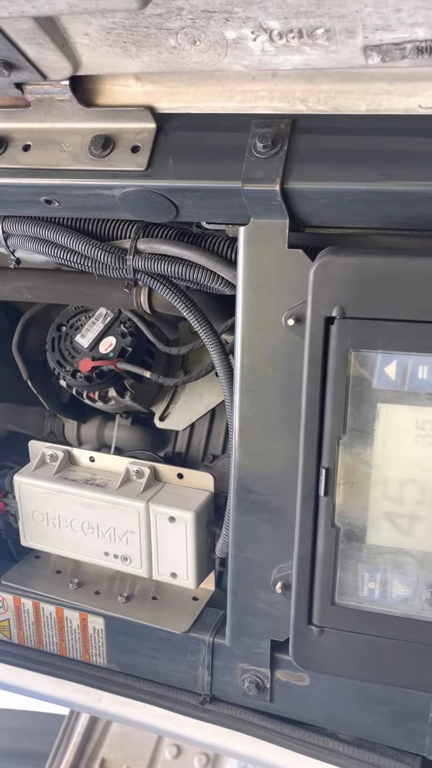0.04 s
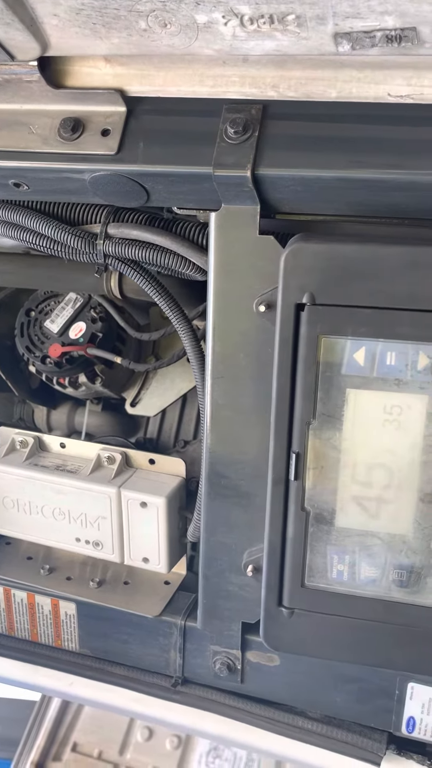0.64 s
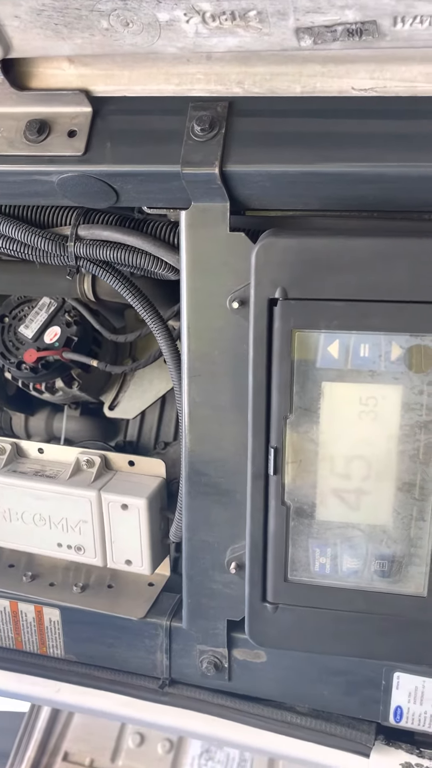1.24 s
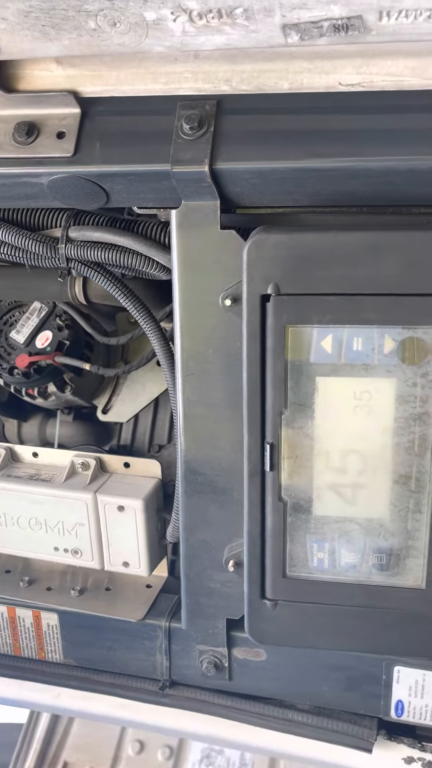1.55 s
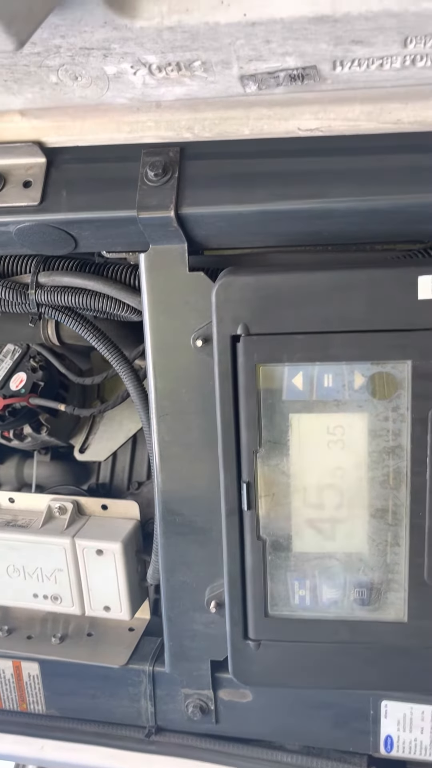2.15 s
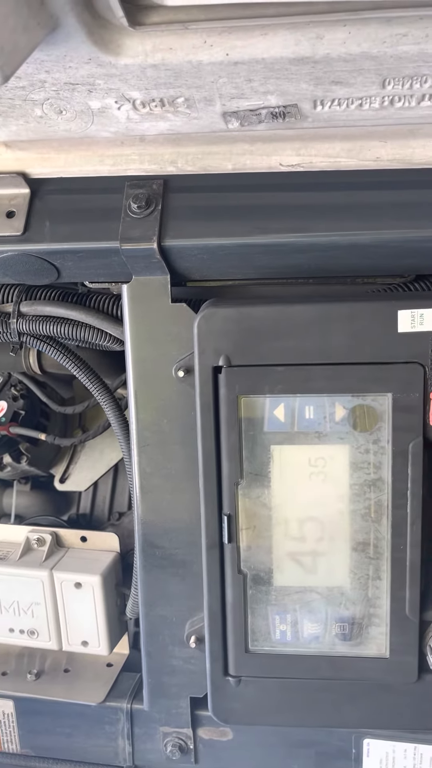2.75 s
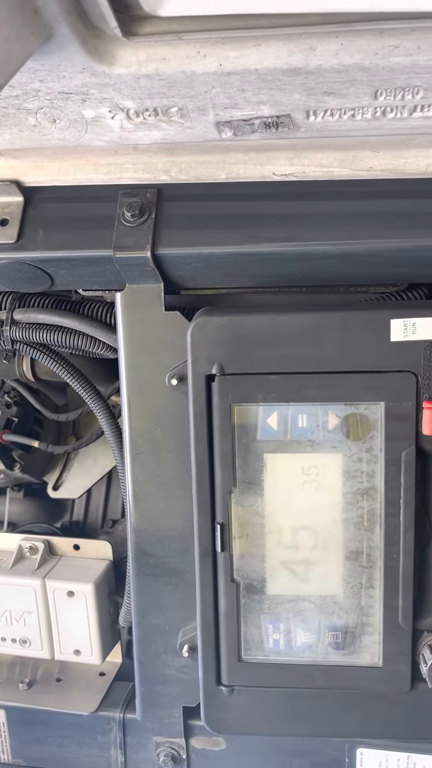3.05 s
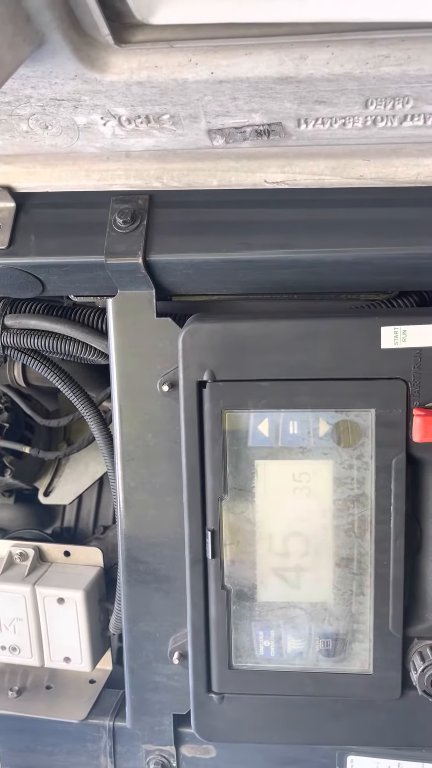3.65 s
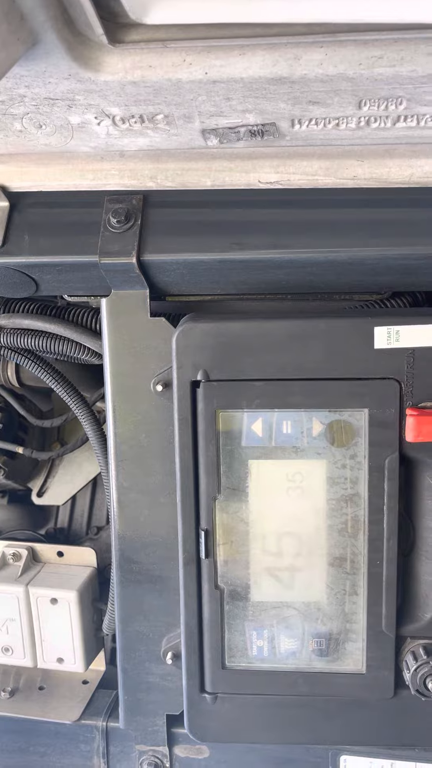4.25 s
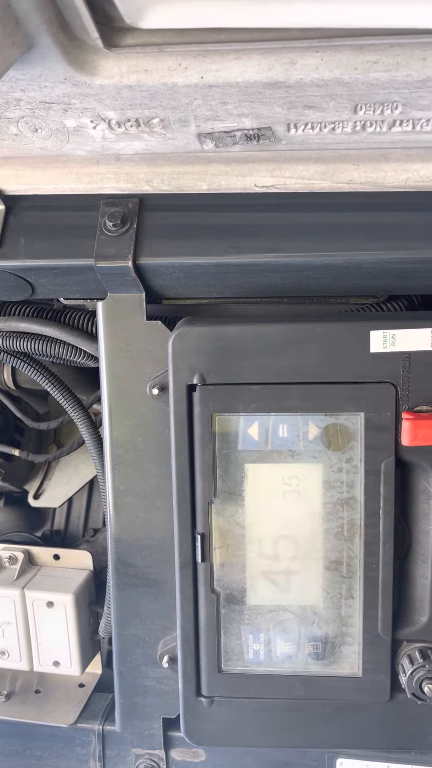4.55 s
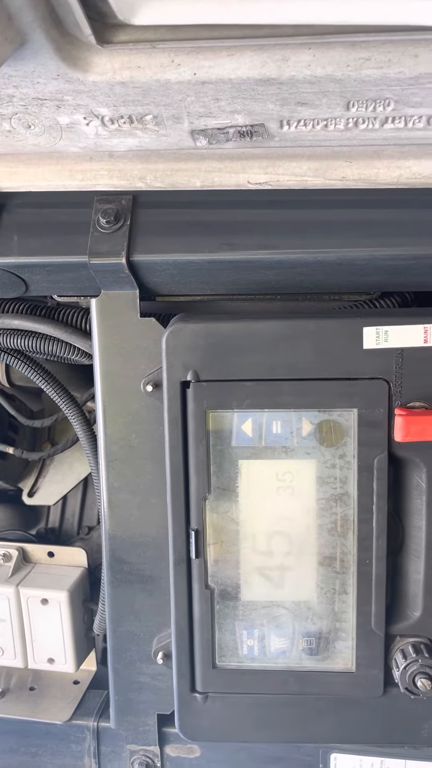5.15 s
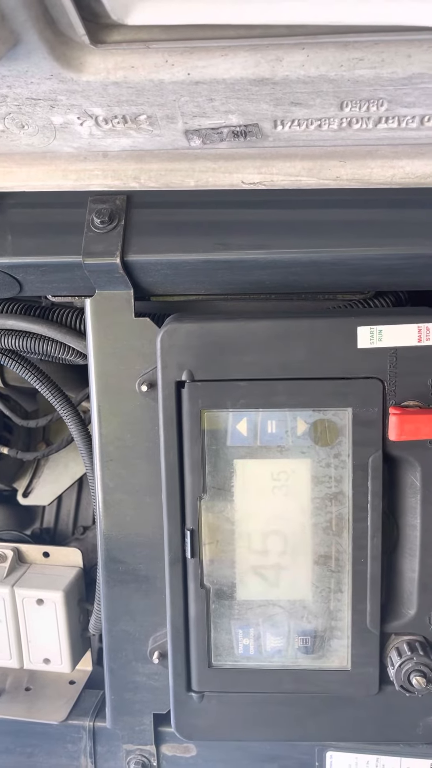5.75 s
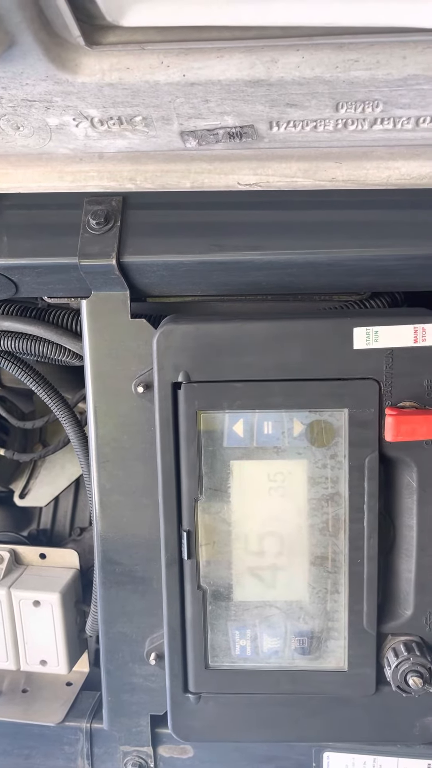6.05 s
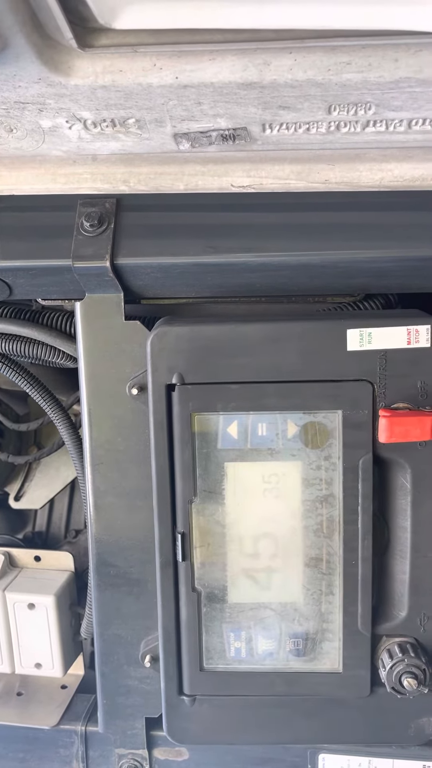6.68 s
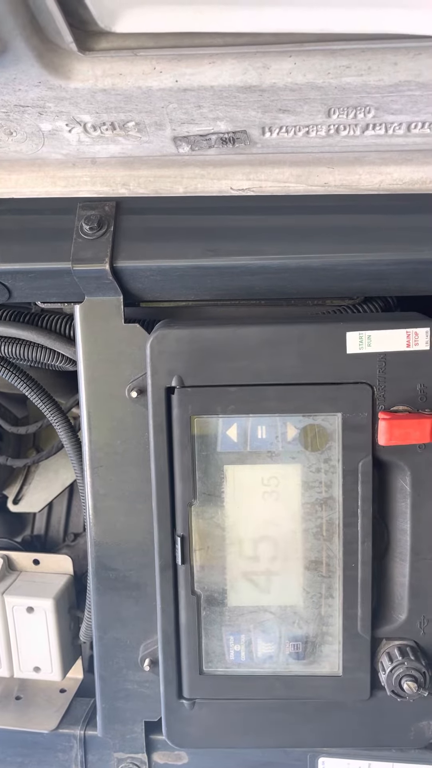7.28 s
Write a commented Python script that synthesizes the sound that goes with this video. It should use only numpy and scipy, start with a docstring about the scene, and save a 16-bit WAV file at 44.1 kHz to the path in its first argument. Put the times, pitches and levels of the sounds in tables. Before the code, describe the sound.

A low, steady drone of diesel machinery and fans outdoors, with gusty wind thuds and occasional short hisses.

```python
"""Outdoors beside the open engine bay of a refrigerated trailer, with other diesel units running nearby.
The engines' firing notes beat against each other over a low rumble, under faint machine whines and
a steady roar of fans and engines. Wind buffets the phone's microphone in short, low thuds and crosses
its two ports in wide puffs. A few brief hisses sweep past, some with hollow bumps inside them."""
import sys
import numpy as np
from scipy import signal
from scipy.fft import rfft, irfft, next_fast_len
from scipy.io import wavfile

SR = 44100
rng = np.random.default_rng(int(sys.argv[2]) if len(sys.argv) > 2 else 0)


def materialize(psi):
    """Save the field psi as 16-bit PCM at rate SR to the path in sys.argv[1].

    A 1-D psi becomes a single channel; in a 2-D psi each row is a channel.
    """
    bounded = np.clip(np.atleast_2d(psi).T, -1, 1)
    quanta = np.round(bounded * 32767).astype(np.int16)
    wavfile.write(sys.argv[1], SR, quanta)


N = 331632
T = np.arange(N) / SR
FREQS = np.maximum(np.fft.rfftfreq(N, 1 / SR), 1e-3)

# stereo width of airborne sound at the two ports: (frequency [Hz], side minus mid [dB])
WIDTH = [(30, -24), (100, -19), (220, -15), (330, -12), (520, -6), (660, -2), (850, -3), (1250, -4.5),
         (1550, -11), (1900, -16), (2400, -6.5), (3000, -4), (4000, -3.5), (4400, 0), (4900, 9), (5500, -6),
         (6000, -18), (6600, -5), (7500, 1), (8300, 11), (9000, 22), (9800, 12), (10600, 2), (11500, -8),
         (12000, -26)]
# share of that width where the left port leads: (frequency [Hz], share [-1 to 1])
LEFT_LEAD = [(250, 0), (470, -.35), (1500, -.2), (1800, .35), (4500, .5), (5300, -.65), (6500, .8),
             (8300, .8), (9700, -.7), (11000, -.85), (12000, 0)]
# firing notes of the engines: (pitch [Hz], relative level [dB])
ENGINE_NOTES = [(46.4, -34), (59.9, -33), (81, -38.5), (106.2, -33.5), (126.7, -33.5), (144.8, -34.5),
                (162.5, -44), (200.5, -49), (224, -54.5)]
# colour of the rumble: (frequency [Hz], relative level [dB])
RUMBLE_EQ = [(18, -32), (30, -2), (45, 6), (65, 6.5), (100, 3), (140, 0.5), (180, -5), (260, -15.5),
             (400, -41), (800, -88)]
# fader ride on the low end above its crossover: (time [s], gain [dB])
BODY_FADER = [(0.0, -27), (0.2, -26.5), (0.35, -25.5), (0.7, -22), (0.97, -28), (1.1, -33.5), (1.45, -27),
              (1.9, -24), (2.7, -25.5), (4.4, -26.5), (5.3, -25), (6.05, -28), (6.42, -42), (6.65, -24),
              (6.88, -33), (7.52, -34.5)]
# fader ride on the low end below its crossover: (time [s], gain [dB])
SUB_FADER = [(0.0, -26.5), (0.18, -22.5), (0.7, -26), (0.93, -29), (1.05, -41), (1.45, -38.5), (2.4, -29.5),
             (2.62, -41), (3.05, -27), (4.5, -29), (4.7, -28), (5.65, -27.5), (6.0, -42), (6.3, -34),
             (6.75, -44), (6.9, -51), (7.52, -45)]
# machine whines: (pitch [Hz], level [dB], pitch wobble [Hz])
WHINES = [(608, -57, 4), (783, -59.5, 8), (1048, -56.5, 8), (1320, -59.5, 7), (1848, -63.5, 22),
          (2239, -63.5, 10), (3423, -71, 10)]
# colour of the fan and engine roar: (frequency [Hz], relative level [dB])
ROAR_EQ = [(60, -19), (250, -6.5), (320, -9), (420, -5), (520, -7.5), (690, -11), (860, -10.5), (1080, -12),
           (1330, -14), (1500, -18), (2250, -21.5), (3200, -26), (4600, -31), (7500, -32), (9000, -34),
           (11000, -32), (11700, -48), (12400, -86)]
# wind thuds: (time [s], nominal length [s], relative level [dB], low edge [Hz], nominal top [Hz])
BUFFETS = [(0.028, 0.0062, -26, 480, 850), (0.085, 0.007, -30.5, 450, 850), (0.154, 0.026, -19, 60, 124),
           (0.205, 0.019, -22, 65, 149), (0.529, 0.0072, -14.5, 152, 397), (0.544, 0.0033, -21.5, 280, 860),
           (0.543, 0.023, -15, 220, 377), (0.575, 0.018, -13, 95, 190), (0.603, 0.0052, -24, 260, 740),
           (0.813, 0.028, -23, 80, 354), (0.86, 0.0061, -18.5, 220, 555), (0.863, 0.019, -16, 90, 308),
           (0.923, 0.026, -21, 55, 131), (4.72, 0.037, -24, 70, 216), (5.161, 0.022, -21, 90, 243),
           (5.442, 0.00803, -11.5, 208, 670), (5.46, 0.023, -14, 55, 160), (5.465, 0.006, -21, 230, 720),
           (5.477, 0.013, -21.5, 230, 600), (5.508, 0.022, -22, 190, 400), (5.54, 0.004, -22, 350, 780),
           (5.543, 0.017, -17, 55, 180), (5.548, 0.011, -13, 240, 470), (5.574, 0.011, -25, 220, 420),
           (6.131, 0.033, -18, 55, 182), (6.168, 0.018, -23, 130, 347), (6.235, 0.0161, -23, 200, 282),
           (6.315, 0.016, -27, 70, 258), (6.773, 0.022, -22.5, 170, 420), (7, 0.047, -23.5, 55.4, 217),
           (7.287, 0.0045, -29, 320, 650), (7.308, 0.0074, -22.5, 270, 493), (7.33, 0.013, -19.5, 190, 440),
           (7.339, 0.012, -23, 45, 120), (7.35, 0.029, -26, 70, 304), (7.363, 0.011, -27.5, 280, 560),
           (7.39, 0.016, -30.5, 190, 420), (7.391, 0.017, -18, 55, 160), (7.412, 0.0096, -33, 170, 380)]
# colour of the wind rumble on the ports: (frequency [Hz], relative level [dB])
GUST_EQ = [(25, -13), (45, -2.5), (75, 3), (130, -10), (250, -9.5), (400, -24.5), (800, -76), (1600, -110)]
# puffs of crosswind: (centre time [s], length [s], level [dB], treble offset [dB])
PUFFS = [(0.12, 0.093, -27.5, -1), (0.283, 0.065, -23.5, 1.5), (0.38, 0.05, -26.5, 1),
         (0.512, 0.12, -28, 3), (0.673, 0.1, -24, -3), (0.824, 0.057, -27, 2), (1.01, 0.16, -30.5, 2.5),
         (1.17, 0.096, -37, 1), (1.71, 0.033, -34, -4), (1.91, 0.05, -38, -2), (2.02, 0.032, -31, -7),
         (2.252, 0.042, -28.5, -5), (2.71, 0.098, -25, -3), (3.203, 0.096, -23, -2),
         (3.673, 0.083, -28, -3), (3.948, 0.086, -26.5, -5), (4.093, 0.099, -34, -14),
         (4.372, 0.083, -21, 1), (4.927, 0.061, -39, -11), (5.04, 0.076, -26.5, -8),
         (5.236, 0.05, -37, -13), (5.337, 0.05, -31, -6), (5.477, 0.12, -33, -5), (5.744, 0.1, -31.5, -12),
         (6.06, 0.079, -27, -1), (6.168, 0.07, -29.5, 3), (6.26, 0.045, -36, 1), (6.364, 0.026, -32.5, 12),
         (6.48, 0.08, -30.5, 7), (6.58, 0.051, -28, -3), (6.835, 0.16, -37.5, 4), (7.233, 0.038, -34, 4)]
# colour of the puffs: (frequency [Hz], relative level [dB])
CROSSWIND_EQ = [(25, -17), (55, -1), (130, 2.5), (200, -4.5), (320, -10), (600, -17.5), (1000, -31),
                (1600, -44), (8000, -115)]
# hisses: (start [s], peak [s], end [s], level [dB], tilt [dB/octave], ring against hiss [dB])
HISSES = [(0.478, 0.582, 0.7, -28.5, -5, -15), (0.577, 0.641, 0.77, -39, -3.5, -6.5),
          (0.677, 0.735, 0.79, -38.5, -3, -9), (3.08, 3.151, 3.39, -45, 5.5, -8),
          (3.487, 3.607, 3.92, -28.5, -4, -18), (3.58, 3.674, 3.94, -40.5, 8, -31),
          (4.63, 4.804, 5.14, -47, 0, -20), (5.197, 5.26, 5.28, -49, 10, -30)]
# colour of a hiss before its tilt: (frequency [Hz], relative level [dB])
HISS_EQ = [(200, 0.5), (430, 7.5), (700, 0.5), (1050, 0), (1350, 4.5), (1550, 0), (1870, 5.5), (2400, 3.5),
           (3200, 1.5), (4350, 2.5), (4900, 0), (5700, 1), (7000, 0.5), (9000, -1.5), (11000, 1),
           (12500, -25), (13500, -43)]
# hollow bumps: (start [s], length [s], level [dB])
BUMPS = [(0.651, 0.065, -36.5), (0.705, 0.065, -29), (0.747, 0.063, -41), (3.71, 0.033, -21.5)]


def undb(db):
    """Decibels to gain."""
    return 10 ** (np.asarray(db) / 20)


def unit(x):
    """Scale to rms 1."""
    return x / np.sqrt(np.mean(x ** 2))


def colour(eq):
    """Gain at every frequency from an EQ curve."""
    hz, db = np.transpose(eq)
    return undb(np.interp(np.log(FREQS), np.log(hz), db))


def fader(points):
    """A level ride in dB: straight lines between timed points."""
    return np.interp(T, *np.transpose(points))


def wander(rate):
    """Smooth random modulation of rms 1 that moves about rate times a second."""
    size = next_fast_len(N, real=True)
    hz = np.fft.rfftfreq(size, 1 / SR)
    return unit(irfft(rfft(rng.standard_normal(size)) * np.exp(-(hz / rate) ** 2), size)[:N])


def air(gain):
    """Coloured stereo noise, part of which reaches one port first."""
    width = colour(WIDTH)
    lead = np.clip(np.interp(FREQS, *np.transpose(LEFT_LEAD)), -1, 1)
    mid, diffuse = rfft(rng.standard_normal((2, N))) * gain / np.sqrt(1 + width ** 2)
    side = width * (1j * lead * mid + np.sqrt(1 - lead ** 2) * diffuse)
    return unit(irfft([mid + side, mid - side], N))


def crossover(x, hz):
    """Split a sound into lows and highs."""
    low = irfft(rfft(x) / (1 + (FREQS / hz) ** 6), N)
    return low, x - low


def puff(centre, length):
    """A round-topped swell, length seconds wide at half height."""
    return 0.5 ** (np.abs(2 * (T - centre) / length) ** 3)


def engine_notes(waver_db=1.5, drift=0.0027, chug_db=1.2, lag_rad=0.044):
    """Diesel firing notes chug unevenly; each wavers and reaches the ports a little out of step."""
    out = 0
    chug = chug_db * wander(25)
    for hz, db in ENGINE_NOTES:
        phase = 2 * np.pi * np.cumsum(hz * (1 + drift * wander(2.01))) / SR
        lag = lag_rad * wander(0.099) * np.array([[1], [-1]])
        out = out + np.sqrt(2) * undb(db + chug + waver_db * wander(3.5)) * np.cos(phase + lag)
    return out


def low_end(notes_db=26.5, sub_db=1.5, lumps_db=1.6):
    """Engine notes beat over a bed of rumble; the sub comes and goes in uneven lumps."""
    bed = undb(notes_db) * engine_notes() + air(colour(RUMBLE_EQ))
    sub, body = crossover(bed, hz=84.3)
    sub_gain = undb(fader(SUB_FADER) + sub_db + lumps_db * wander(6))
    return undb(fader(BODY_FADER)) * body + sub_gain * sub


def whines(waver_db=4.0, lag_rad=0.5):
    """Thin, unsteady machine tones waver in and out of the roar."""
    out = 0
    for hz, db, wobble_hz in WHINES:
        phase = 2 * np.pi * np.cumsum(hz + wobble_hz * wander(12)) / SR
        lag = lag_rad * wander(1.8) * np.array([[1], [-1]])
        out = out + undb(db) * unit(undb(waver_db * wander(11)) * np.cos(phase + lag))
    return out


def roar(level_db=-36.5, flutter_db=1.15, flicker_db=0.56, throb=0.03, duck_from_db=-24):
    """Fan and engine wash: the mids duck in strong puffs, the top throbs with the slowest engine."""
    mids, top = crossover(air(colour(ROAR_EQ)), hz=840)
    firing = 1 + throb * np.cos(2 * np.pi * ENGINE_NOTES[0][0] * T)
    wind_power = sum(undb(2 * (db + treble_db - duck_from_db)) * puff(centre, length)
                     for centre, length, db, treble_db in PUFFS)
    mids = mids * undb(flutter_db * wander(14)) / np.sqrt(1 + wind_power)
    top = top * firing * undb(flicker_db * wander(31))
    return undb(level_db) * (mids + top)


def buffets(trim_db=-4.5, stretch=2.0, top_scale=0.8, ceiling_hz=850, rise=0.19, jolt=1.155, width=0.085):
    """Each eddy hits the ports with one jolt and a few pressure swings; faster eddies sound brighter."""
    out = np.zeros((2, N + SR))
    hz = np.maximum(np.fft.rfftfreq(SR, 1 / SR), 1)
    port = 1 / np.sqrt(1 + (hz / ceiling_hz) ** 12)
    for time, length, db, low_hz, top_hz in BUFFETS:
        size = int(length * stretch * SR)
        start = max(int((time - 0.203 * length) * SR), 0)
        push = np.sin(np.pi / 2 * np.interp(np.arange(size) / size, [0, rise, 1], [0, 1, 0])) ** 2
        band = port / np.sqrt((1 + (low_hz / hz) ** 6) * (1 + (hz / (top_scale * top_hz)) ** 8))
        swings = push * rng.standard_normal((2, SR))[:, :size]
        swings[0, np.argmax(push)] += jolt * np.linalg.norm(push)  # the eddy's core passes
        whitened = np.exp(1j * np.angle(rfft(swings, SR)))
        thud = np.roll(irfft(1j * band * whitened), SR // 2, axis=1)  # half a second of pre-roll
        mid, side = unit(thud) * np.sqrt(size / SR)
        stereo = np.array([mid + width * side, mid - width * side])
        out[:, start:start + SR] += undb(db + trim_db) * stereo
    return out[:, SR // 2:SR // 2 + N]


def gusts(trim_db=-3.5, late=0.58):
    """Wind rumbles on the ports around each buffet, following its strength and length."""
    power = sum(undb(2 * db) * np.exp(-((T - time - late * length) / length) ** 2)
                for time, length, db, *_ in BUFFETS)
    return undb(trim_db) * np.sqrt(power) * air(colour(GUST_EQ))


def crosswind(flutter_db=2.5):
    """Puffs cross the phone and push its two ports in opposite ways: a wide, fluttering rumble."""
    noise = unit(irfft(rfft(rng.standard_normal(N)) * colour(CROSSWIND_EQ), N))
    bass, treble = crossover(noise, hz=300)
    bass_power = sum(undb(2 * db) * puff(centre, length) for centre, length, db, _ in PUFFS)
    treble_power = sum(undb(2 * (db + treble_db)) * puff(centre, length)
                       for centre, length, db, treble_db in PUFFS)
    wind = np.sqrt(bass_power) * bass + np.sqrt(treble_power) * treble
    return undb(flutter_db * wander(22)) * wind * np.array([[1], [-1]])


def hisses(ring_hz=2106, climb_hz=218.5, ring_width_hz=690, grain_db=0.2, scuff_db=0.8):
    """Short swells of broad, grainy hiss carry a thin ring whose pitch lifts with each swell."""
    octaves = np.log2(np.maximum(FREQS, 200) / 2500)
    out = 0
    for start, peak, end, db, tilt, ring_db in HISSES:
        swell = np.sin(np.pi / 2 * np.interp(T, [start, peak, end], [0, 1, 0])) ** 2
        hiss = air(colour(HISS_EQ) * undb(tilt * octaves))
        phase = 2 * np.pi * np.cumsum(ring_hz + climb_hz * swell) / SR
        ring = unit(wander(ring_width_hz / 2) * np.cos(phase))
        out = out + undb(db + scuff_db * wander(27)) * swell * (hiss + undb(ring_db) * ring)
    return out * undb(-grain_db * wander(240))


def bumps(start_hz=415, climb_hz_per_s=1500, wobble=0.0501, rough_db=2.5):
    """Brief, rough, hollow notes climb a little as they swell and fade."""
    out = 0
    unsteady = 1 + wobble * wander(67.5)
    for start, length, db in BUMPS:
        age = np.clip(T - start, 0, length)
        phase = 2 * np.pi * np.cumsum((start_hz + climb_hz_per_s * age) * unsteady) / SR
        out = out + undb(db) * np.sin(np.pi * age / length) ** 2 * np.cos(phase)
    return out * undb(-rough_db * wander(90))


def scene():
    """The mix: a machinery bed, wind on the microphone, and passing hisses and bumps."""
    return low_end() + whines() + roar() + buffets() + gusts() + crosswind() + hisses() + bumps()


def record(dry):
    """The phone cuts the deepest bass and the very top; quick fades ease the sound in and out."""
    fades = np.clip(np.minimum(T, T[-1] - T) / .005, 0, 1)
    low_cut = signal.butter(5, 33, "high", fs=SR, output="sos")
    high_cut = signal.ellip(8, .2, 80, 13400, fs=SR, output="sos")
    return signal.sosfilt(high_cut, fades * signal.sosfilt(low_cut, dry))


dry = scene()
out = record(dry)
materialize(out)
```